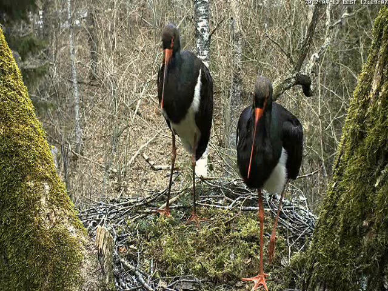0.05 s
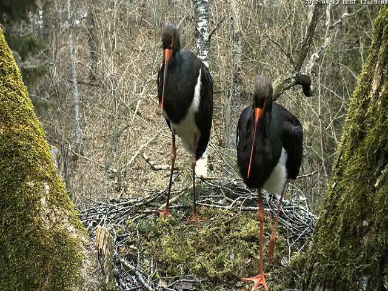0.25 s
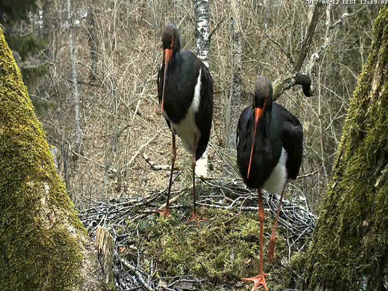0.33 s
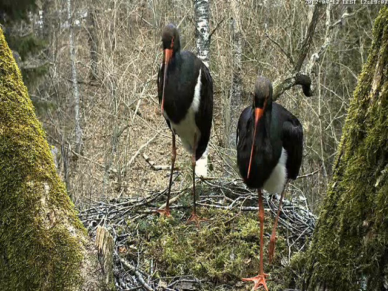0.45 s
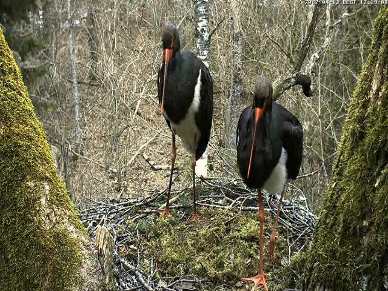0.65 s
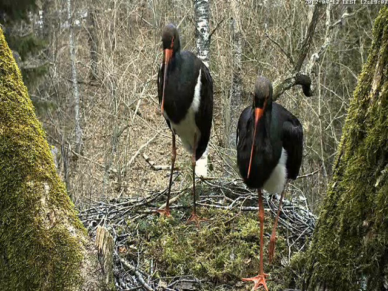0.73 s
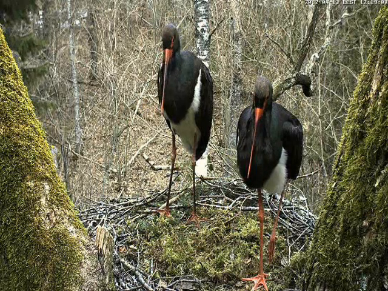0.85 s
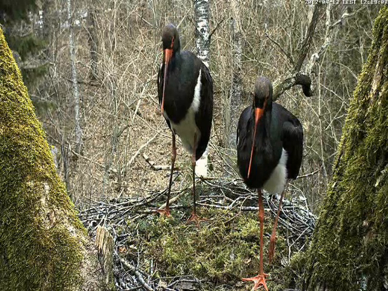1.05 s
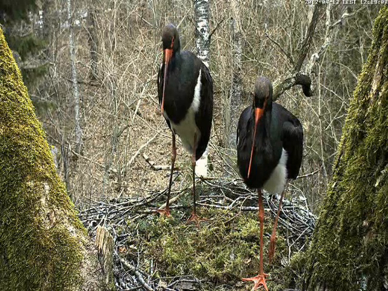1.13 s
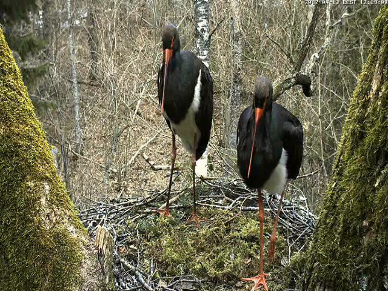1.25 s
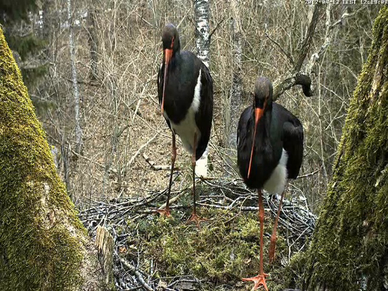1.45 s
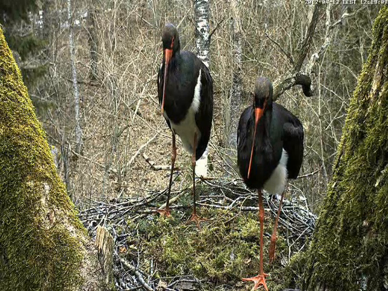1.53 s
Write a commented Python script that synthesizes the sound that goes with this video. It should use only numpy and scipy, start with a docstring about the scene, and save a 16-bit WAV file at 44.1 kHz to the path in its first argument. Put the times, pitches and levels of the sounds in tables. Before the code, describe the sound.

Soft wind and faint twig ticks open a quiet wood. At about 0.2 s a distant crane bugles, catching roughly, swelling and holding near 890 Hz, then sagging from 0.55 to a weaker 750 Hz until 0.9. A second crane overlaps from 0.57 to 0.8 at the higher pitch. Fluttering echoes ring on to the end, with dry ticks around 1.2-1.4 and faint thin bird whistles at 1.1 and 1.5. Dull, narrow-band sound.

```python
"""Crane duet in a ringing wood

A distant crane gives one drawn-out bugle that catches, swells, holds its pitch, sags and lingers low;
its mate joins as it falls. Both are harmonic tones with random modulation, sidebands and a noisy husk.
Trees return them as delayed copies, a decaying noise tail and short tonal swells. Shaped noise makes
soft wind and twig ticks, gliding sines a small bird's thin whistles; all sound dull in a narrow band."""
import sys
import numpy as np
from scipy import signal
from scipy.fft import rfft, irfft, next_fast_len
from scipy.io import wavfile
from scipy.ndimage import map_coordinates

SR = 44100
rng = np.random.default_rng(int(sys.argv[2]) if len(sys.argv) > 2 else 0)


def wrap_up_sound(samples):
    """Save the sound to the file named by the first command line argument, as 16-bit audio."""
    columns = np.atleast_2d(samples).T
    # keep every value between -1 and 1, then stretch to whole-number steps
    tamed = np.clip(columns, -1, 1)
    steps = np.round(tamed * 32767).astype(np.int16)
    wavfile.write(sys.argv[1], SR, steps)


N = 70560  # samples

# spectra of the low rush and of the lighter rustle in the branches: f/Hz, relative density level/dB
RUSH_SPECTRUM = [(20, -4.5), (80, -9), (125, -4), (165, 1), (205, -1), (300, 0), (550, -3), (1000, -5.5),
                 (1500, -14.5), (3500, -42.5)]
RUSTLE_SPECTRUM = [(300, -28.5), (1000, -6.5), (1600, 0), (2400, -1), (3000, -4), (3600, -5)]
# mean strength of the rush and of the rustle: t/s, level/dB
RUSH_LEVEL = [(0.0, -59), (0.258, -57.5), (0.284, -58), (0.356, -55.5), (1.408, -57), (1.514, -59),
              (1.6, -59.5)]
RUSTLE_LEVEL = [(0, -52), (.15, -55.5), (.26, -50.5), (.6, -50.5), (.9, -52), (1.25, -49), (1.45, -52.5),
                (1.6, -54.5)]

# twigs and dry stalks: t/s, centre f/Hz, offset at quarter gain/Hz, Gaussian deviation/s, level/dB
TICKS = [(0.042, 1940, 400, .01, -59), (0.148, 700, 396, 0.0066, -52.5), (0.226, 340, 299, 0.013, -56),
         (0.251, 1103, 89.4, 0.0083, -56), (1.219, 2570, 900, 0.0077, -54), (1.309, 2530, 902, 0.0091, -52),
         (1.391, 2510, 320, 0.0046, -52), (1.407, 2470, 320, 0.0033, -45)]

# course of the first crane's call, then its mate's: t/s, f/Hz, level/dB, overtones re fundamental/dB
LEAD_CALL = [(.19, 829, -54.5, -4.5), (.197, 835, -38, -14), (.228, 875, -66, -12.5),
             (.244, 850, -41, -10.5), (.28, 881, -37, -9), (.31, 872, -50, 2), (.335, 884, -39.5, -11),
             (.385, 901.3, -39.5, -7.5), (.412, 895.4, -34.5, -8.5), (.455, 900, -39, -5),
             (.51, 894, -40.5, -6.5), (.56, 868.8, -52, 7.5), (.587, 851.5, -51.5, -6.5),
             (.62, 804.6, -49.5, -3.5), (.7, 758, -47, -9.5), (.745, 756, -58.5, 2.5),
             (.83, 756, -60.5, -0.5), (.875, 745.8, -53, -10.5), (.92, 750, -61.5, -7)]
MATE_CALL = [(.572, 876.5, -48, -7.5), (.587, 864, -41, -21.5), (.608, 881.8, -40, -1.5),
             (.64, 874.4, -51, -4), (.675, 884.6, -39, -9), (.715, 876, -44, -5.5), (.75, 876.5, -40, -9),
             (.779, 867, -36, -15.5), (.788, 860, -51.5, -5)]
# harmonics 2-4 of each bird: level at full effort/dB, extra dB per dB of effort
LEAD_OVERTONES = [(-1.5, 0), (-10, 3.7), (-33.5, 2.5)]
MATE_OVERTONES = [(2, 0.5), (-26, 3.5), (-32.5, 7.5)]
# irregularity of both voices: t/s, roughness (0-1)
ROUGHNESS = [(.19, 1.0), (.25, .7), (.28, .35), (.36, .25), (.55, .25), (.61, .7), (.77, .7), (.82, 1.0)]
JITTER, SHIMMER_DB = .014, 3.5  # random pitch (fraction) and level deviations at roughness 1
FLUTTER_PER_S, EDGE_S = 170, .0072  # random knots per second; onset and release time
# a slow second vibration of the throat: sidebands below and above each harmonic
RASP_BELOW_DB, RASP_ABOVE_DB, RASP_HZ = -15.5, -23.5, 59.88
HUSK_DB, HUSK_KNOTS_PER_S = -16.5, 180

# decay of the scattered sound in the wood: f/Hz, 60 dB decay time/s
WOOD_T60 = [(500, 7.8), (900, 1.72), (1800, 2.0), (3500, 3.5)]
WOOD_DB, WOOD_BUILD_S = -8.5, .016  # level re calls; time constant of the build-up

# stands of trees: first crane's delay t/s, level re call/dB, mate's delay t/s, level re call/dB
STANDS = [(.17, -21, .218, -19), (.56, -18, .37, -22), (.85, -24, .57, -24), (1.13, -26, .8, -23)]
# soft ground swallows the lows on the long paths: f/Hz, level/dB
ECHO_COLOUR = [(700, -14), (810, -10), (865, -1), (890, 0), (1500, -4), (1800, -2), (2700, -10)]
ECHO_SMEAR_S, ECHO_SCATTER = .096, .22  # time to fall 60 dB; scattered part against the direct copy

# brief swells in the ringing: t/s, length/s, f/Hz, level/dB, octave re fundamental/dB
SWELLS = [(.833, .016, 878, -40, -14), (.894, .016, 874, -39.5, -16), (.927, .03, 887, -43, -20),
          (.957, .054, 884, -37, -13), (1.031, .02, 881, -40.5, -20), (1.06, .045, 885, -45, -16),
          (1.157, .08, 888, -42.5, -16), (1.24, .125, 881, -47, -22)]
SWELL_EDGE_S, SWELL_ROUGHNESS = .004, .5

# a small bird: t/s, length/s, start f/Hz, end f/Hz, peak level/dB
WHISTLES = [(1.11, .07, 3500, 3470, -62), (1.505, .115, 3680, 3290, -58)]
WHISTLE_SETTLE_S, WHISTLE_FLUTTER_DB = .018, 1.5

# spectrum of a very faint hiss, mostly above the band: f/Hz, relative density level/dB
HISS_SPECTRUM = [(4200, -10.5), (4600, 0), (11500, 1), (12800, -4)]
HISS_DB, BAND_HZ, BAND_EXPONENT, TOP_HZ = -80, 3483, 58.6, 12800


def amp(db):
    """Amplitude ratio from a level in decibels."""
    return 10 ** (np.asarray(db) / 20)


def unit(x):
    """Normalization to unit rms."""
    return x / np.sqrt(np.mean(x ** 2) + 1e-20)


def along(points, hz):
    """Interpolation of (f/Hz, value) points on a logarithmic frequency axis."""
    f, v = np.transpose(points)
    return np.interp(np.log(hz + 1), np.log(f + 1), v)


def curves(rows):
    """Linear interpolation in time: one value per sample for each column after t/s."""
    t, *columns = np.transpose(rows)
    return [np.interp(np.arange(N) / SR, t, column) for column in columns]


def wobble(rate):
    """Slow random modulation: a smooth curve through rate Gaussian knots a second."""
    return map_coordinates(rng.standard_normal(2000), [np.arange(N) * rate / SR], mode="mirror")


def filtered(x, response):
    """Linear filtering: the spectrum of x times a response of frequency."""
    m = next_fast_len(N + SR // 2)
    return irfft(rfft(x, m) * response(np.fft.rfftfreq(m, 1 / SR)), m)[:N]


def noise(response):
    """Coloured noise of unit rms from filtered white noise."""
    return unit(filtered(rng.standard_normal(N), response))


def wind():
    """Turbulent noise: a low rush through the wood and a lighter rustle in the branches."""
    rush_db, = curves(RUSH_LEVEL)
    rustle_db, = curves(RUSTLE_LEVEL)
    rush = amp(rush_db + 0.77 * wobble(24)) * noise(lambda hz: amp(along(RUSH_SPECTRUM, hz)))
    rustle = amp(rustle_db + 1.3 * wobble(69.7)) * noise(lambda hz: amp(along(RUSTLE_SPECTRUM, hz)))
    return rush + rustle


def twigs():
    """Resonance under brief excitation: short dry scrapes, each noise in one broad resonance."""
    t = np.arange(N) / SR
    out = np.zeros(N)
    for s, hz, width, length, db in TICKS:
        envelope = np.exp(-.5 * ((t - s) / length) ** 2)
        scrape = envelope * noise(lambda f: 1 / (1 + ((f - hz) / width) ** 2) ** 2)
        out += amp(db) * np.std(envelope) * unit(scrape)
    return out


def crane(call, overtones):
    """Harmonic voicing: a nearly pure bugle brightens with effort; modulation adds rasp and husk."""
    t = np.arange(N) / SR
    hz, db, bright_db = curves(call)
    rough, = curves(ROUGHNESS)
    effort_db = db - db.max()
    onset = np.clip((t - call[0][0]) / EDGE_S, 0, 1)
    release = np.clip((call[-1][0] - t) / EDGE_S + 1, 0, 1)
    phase = 2 * np.pi * np.cumsum(hz * (1 + JITTER * rough * wobble(FLUTTER_PER_S))) / SR
    slow = 2 * np.pi * np.cumsum(RASP_HZ * (1 + .35 * wobble(40))) / SR
    levels = [0] + [bright_db + level + growth * effort_db for level, growth in overtones]
    voice = np.zeros(N)
    for k, level in enumerate(levels, 1):
        below = amp(RASP_BELOW_DB) * np.sin(k * phase - slow)
        above = amp(RASP_ABOVE_DB) * np.sin(k * phase + slow)
        shimmer_db = SHIMMER_DB * rough * wobble(FLUTTER_PER_S)
        voice += amp(level + shimmer_db) * (np.sin(k * phase) + below + above)
    # noise-modulated carrier on the lower sideband of the third harmonic
    husk = amp(bright_db + HUSK_DB) * wobble(HUSK_KNOTS_PER_S) * np.sin(3 * phase - slow)
    return np.sqrt(2) * onset * release * amp(db) * (voice + husk)


def wood(x):
    """Diffuse reverberation: countless trunks scatter the call into a long tail."""
    hz, t, z = signal.stft(rng.standard_normal(N), SR, nperseg=256)
    decay = amp(-60 * t / along(WOOD_T60, hz)[:, None])
    build = 1 - np.exp(-t / WOOD_BUILD_S)
    tail = signal.istft(z * decay * build, SR, nperseg=256)[1]
    return amp(WOOD_DB) * np.std(x) * unit(signal.fftconvolve(x, tail)[:N])


def echo(x, delay, db):
    """Discrete reflection: a late, slightly smeared copy from one stand of trees."""
    t = np.arange(N) / SR
    scatter = rng.standard_normal(N) * amp(-60 * t / ECHO_SMEAR_S)
    copy = unit(x) + ECHO_SCATTER * unit(signal.fftconvolve(x, scatter)[:N])
    return amp(db) * np.std(x) * np.interp(t - delay, t, unit(copy), left=0)


def echoes(lead, mate):
    """Path delay and absorption: all returns lose their lows and some of their highest overtones."""
    returns = np.zeros(N)
    # each bird reaches each stand by its own path
    for lead_delay, lead_db, mate_delay, mate_db in STANDS:
        returns += echo(lead, lead_delay, lead_db)
        returns += echo(mate, mate_delay, mate_db)
    return filtered(returns, lambda hz: amp(along(ECHO_COLOUR, hz)))


def swells():
    """Uneven reverberation: the wood rings in short fluttering arches near the pitch of the call."""
    out = np.zeros(N)
    for s, length, hz, db, octave_db in SWELLS:
        age = np.clip(np.arange(N) / SR - s, 0, length)
        arch = np.sqrt(np.abs(np.sin(np.pi * age / length))) * np.minimum(age / SWELL_EDGE_S, 1)
        jitter = JITTER * SWELL_ROUGHNESS * wobble(FLUTTER_PER_S)
        phase = 2 * np.pi * np.cumsum(hz * (1 + jitter)) / SR
        gain = amp(db + SHIMMER_DB * SWELL_ROUGHNESS * wobble(FLUTTER_PER_S))
        tone = np.sin(phase) + amp(octave_db) * np.sin(2 * phase)
        out += np.sqrt(2) * gain * arch * tone
    return out


def songbird():
    """Exponential frequency glide: thin whistles that drop and settle on a note."""
    out = np.zeros(N)
    for s, length, start_hz, end_hz, db in WHISTLES:
        age = np.clip(np.arange(N) / SR - s, 0, length)
        glide = end_hz + (start_hz - end_hz) * np.exp(-age / WHISTLE_SETTLE_S)
        hz = glide * (1 + 0.0088 * wobble(130))
        arch = np.sqrt(np.abs(np.sin(np.pi * age / length)))
        gain = amp(db + WHISTLE_FLUTTER_DB * wobble(99))
        out += gain * arch * np.sin(2 * np.pi * np.cumsum(hz) / SR)
    return out


def scene():
    """Superposition: the cranes with their echoes over the quiet wood."""
    lead = crane(LEAD_CALL, LEAD_OVERTONES)
    mate = crane(MATE_CALL, MATE_OVERTONES)
    calls = lead + mate
    ringing = echoes(lead, mate) + wood(calls) + swells()
    background = wind() + twigs() + songbird()
    return (calls + ringing + background)[None]


def record(dry):
    """Band limitation: a narrow band with a very faint hiss, mostly above it."""
    heard = filtered(dry[0], lambda hz: 1 / np.sqrt(1 + (hz / BAND_HZ) ** BAND_EXPONENT))
    hiss = amp(HISS_DB) * noise(lambda hz: amp(along(HISS_SPECTRUM, hz)))
    return filtered(heard + hiss, lambda hz: hz < TOP_HZ)[None]


dry = scene()
out = record(dry)
wrap_up_sound(out)
```